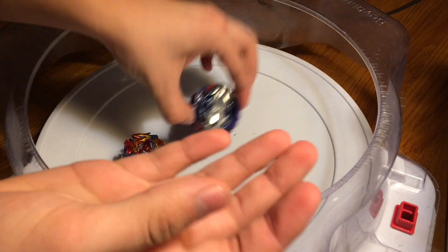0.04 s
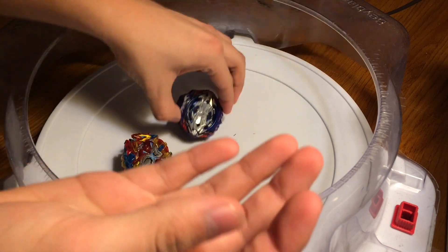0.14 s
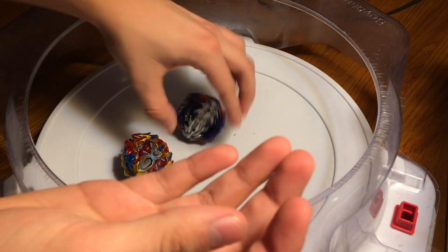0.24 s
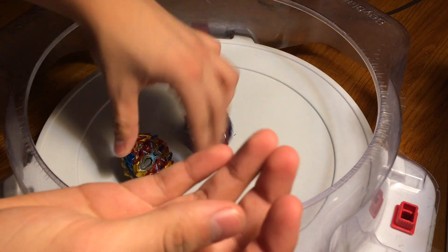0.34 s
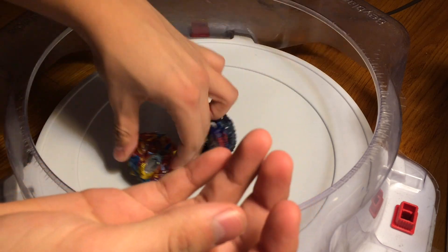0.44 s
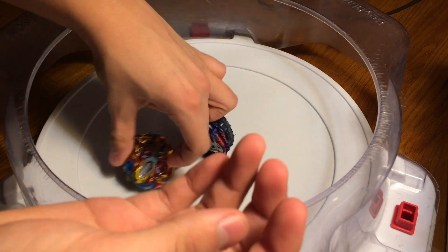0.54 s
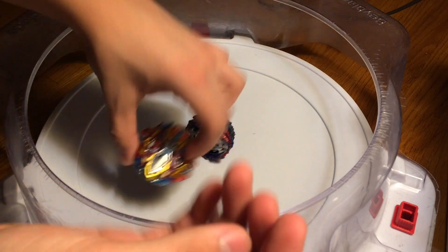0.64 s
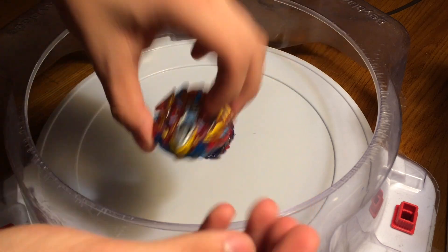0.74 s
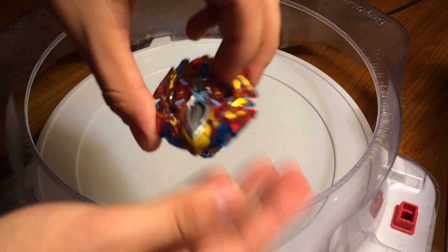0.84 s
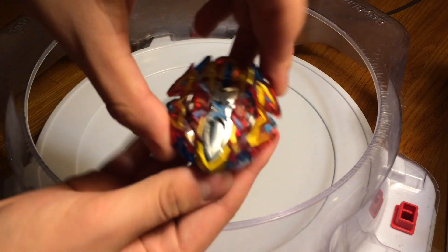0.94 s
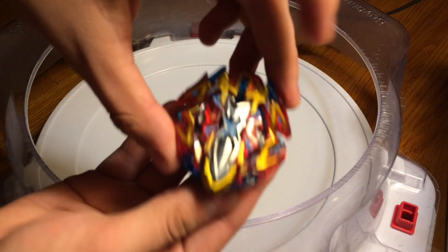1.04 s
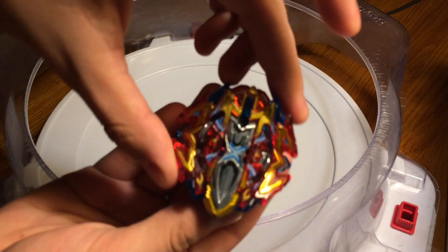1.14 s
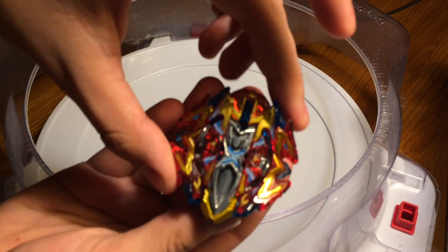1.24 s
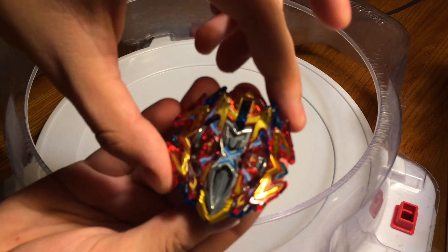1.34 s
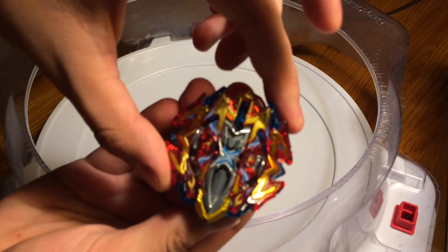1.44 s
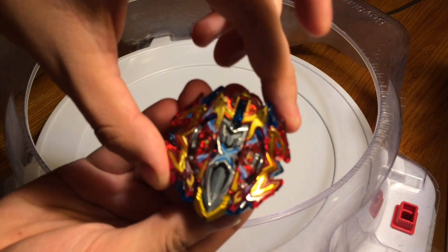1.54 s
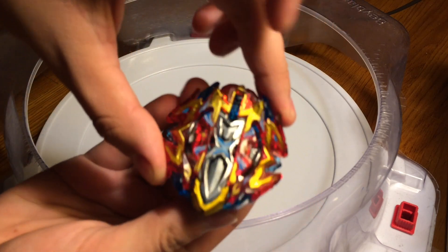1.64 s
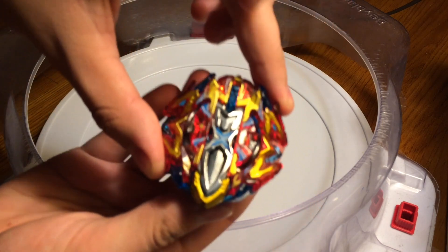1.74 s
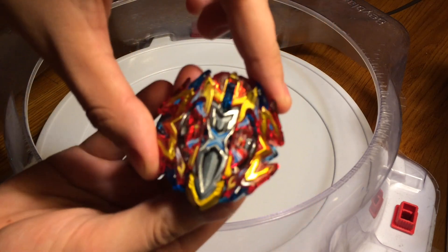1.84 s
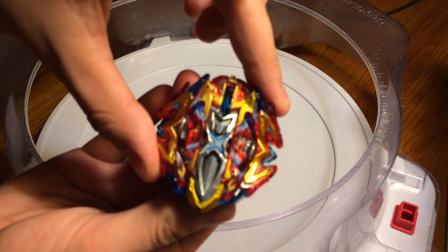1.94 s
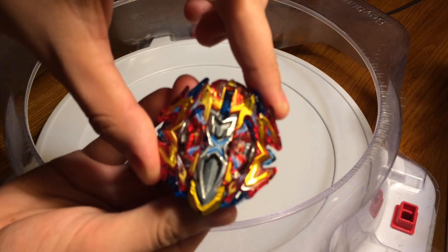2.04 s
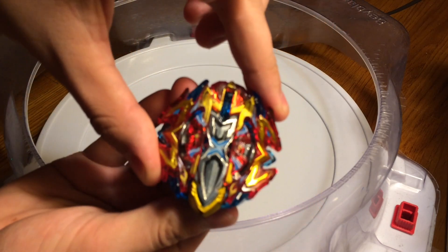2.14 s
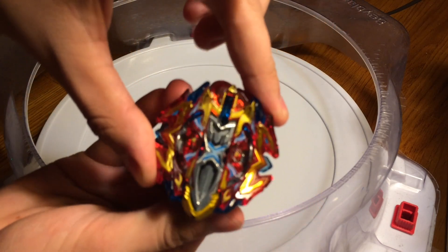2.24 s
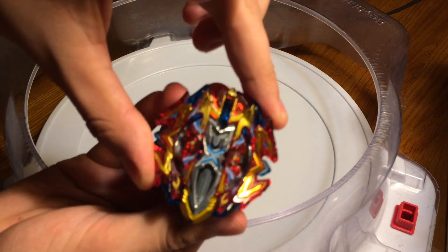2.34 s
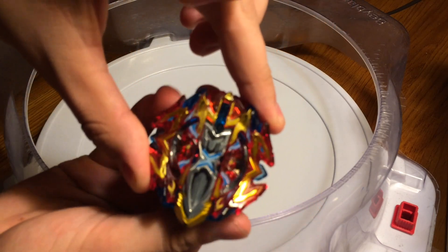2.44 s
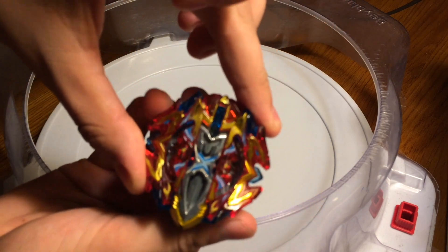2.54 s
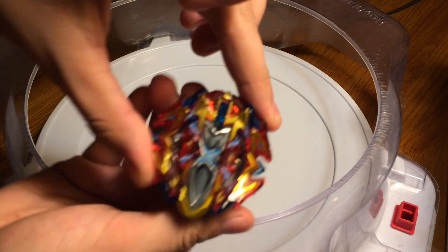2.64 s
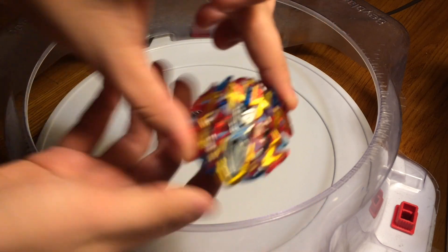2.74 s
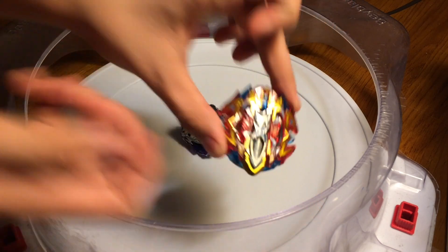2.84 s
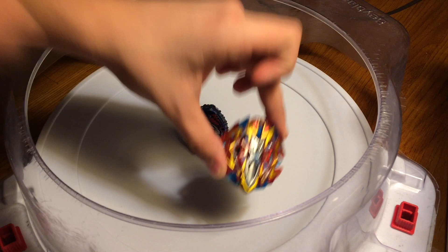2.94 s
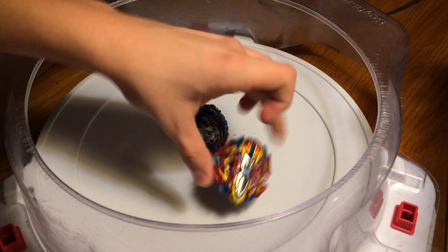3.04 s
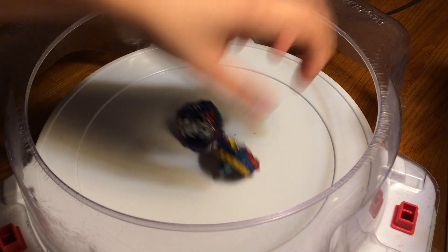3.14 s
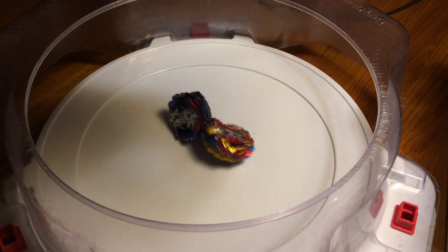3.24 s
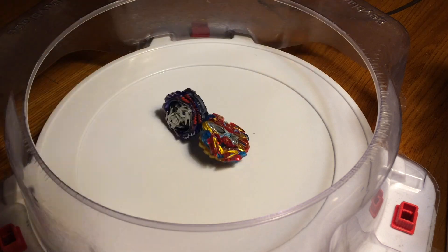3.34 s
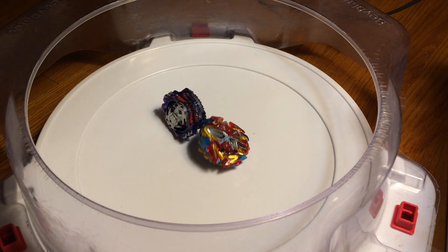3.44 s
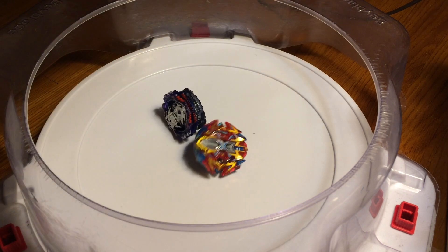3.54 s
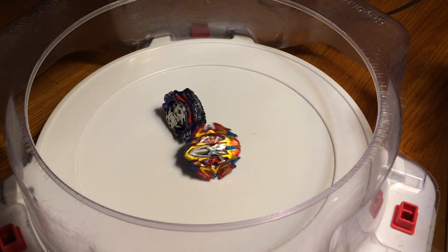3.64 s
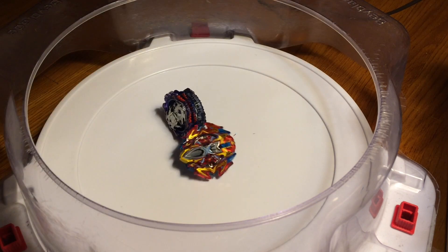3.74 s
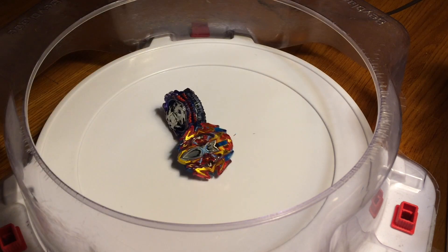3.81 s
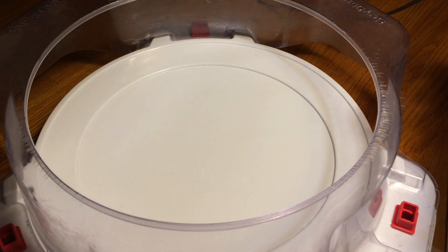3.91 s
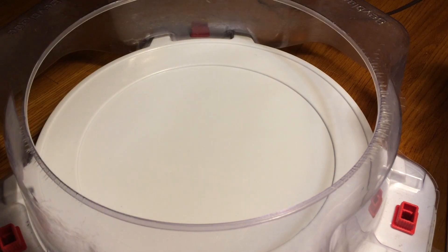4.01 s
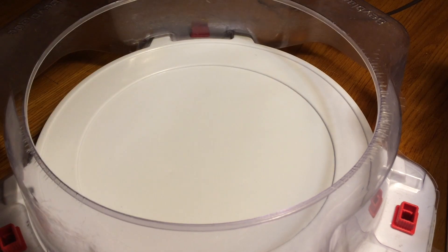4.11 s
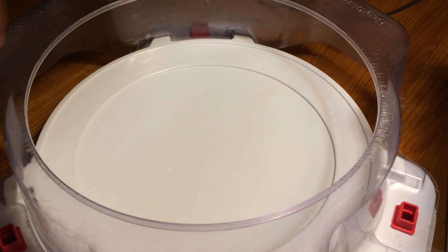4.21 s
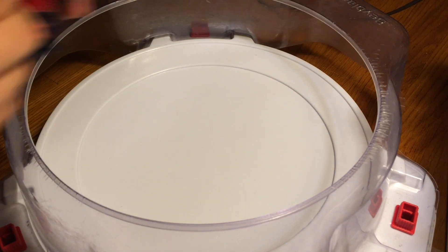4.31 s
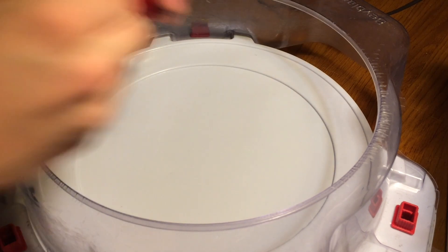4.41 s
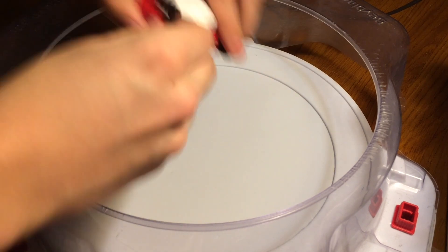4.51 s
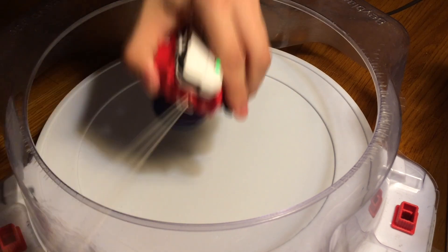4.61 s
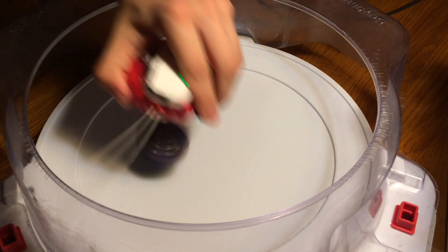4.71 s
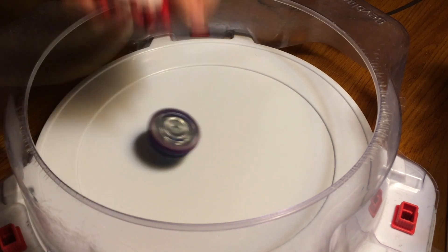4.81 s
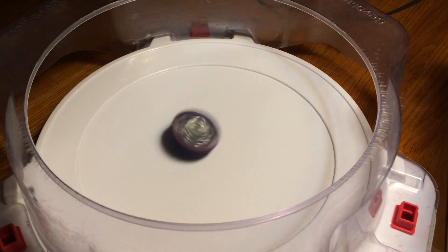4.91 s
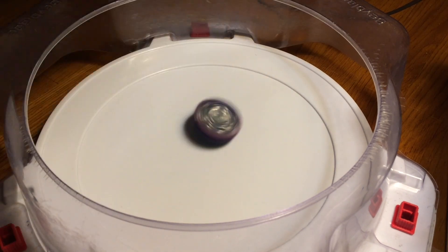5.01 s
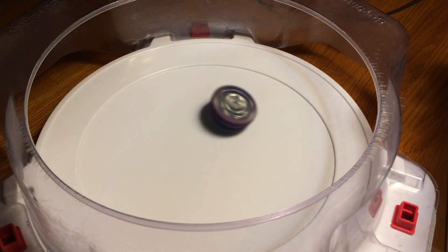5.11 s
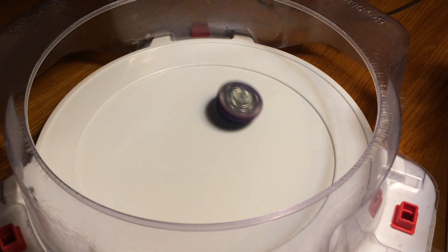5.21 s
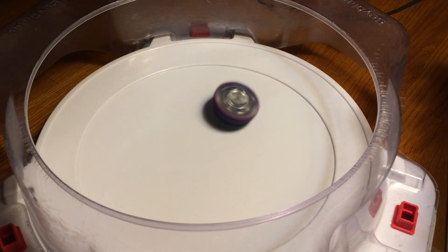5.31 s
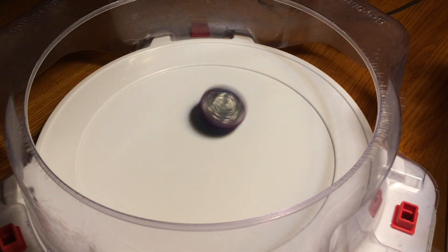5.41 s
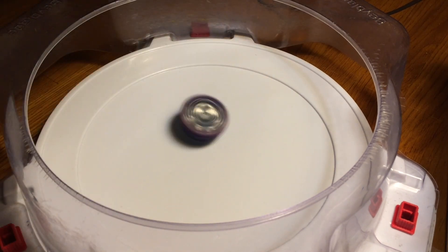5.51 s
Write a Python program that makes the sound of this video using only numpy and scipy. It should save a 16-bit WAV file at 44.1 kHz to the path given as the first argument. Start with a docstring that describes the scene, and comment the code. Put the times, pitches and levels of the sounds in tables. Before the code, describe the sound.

Toy tops clatter on the thin plastic floor of an arena, with hollow thuds and brief metallic rings. One is handled with faint ticks, twisted shut in three sharp clicks and dropped back with a loud rattle. A ratchet launcher then whirrs up, its cord ends with a dull jolt, and the spinning top hops and scrapes across the bowl. The sounds are close, in a small room with a faint low hum.

```python
"""Toy tops of plastic and metal clatter on the thin plastic floor of an arena, close by in a small room:
the floor thuds, the shells clack, the metal discs ring. One top is picked up, twisted shut in three
clicks (2.3 s) and dropped back (3.2 s). A ratchet launcher rustles in the hand, then whirrs up (4.7 s).
The spinning top leaves it and the cord runs out with a dull jolt; the top lands, hops and scrapes
across the bowl. The room murmurs throughout."""
import sys
import numpy as np
from scipy import signal
from scipy.io import wavfile
from scipy.ndimage import uniform_filter1d

SR = 44100
rng = np.random.default_rng(int(sys.argv[2]) if len(sys.argv) > 2 else 0)


def unload_audio(sound):
    """Save the sound as a 16-bit wav file, at the path given as the first command line argument."""
    columns = np.transpose(np.atleast_2d(sound))
    # keep every value between -1 and 1, then stretch to whole-number steps
    steps = np.round(np.clip(columns, -1, 1) * 32767)
    wavfile.write(sys.argv[1], SR, steps.astype(np.int16))


N = 245179
TIME_S = np.arange(N) / SR
HIT_TIME_S = TIME_S[:8192]

# room murmur (frequency [Hz], level [dB])
MURMUR_SPECTRUM = [(20, -24.5), (45, -11.5), (90, 5.5), (140, -2.5), (195, 4), (270, -7.5), (400, -8.5),
                   (700, -17.5), (1400, -20.5), (2800, -29.5), (6000, -29), (15000, -37.5)]
# hard parts clicking together, and at 3.2157 s two tops clashing rim on rim (time [s], strength [dB], hardness
# [dB])
PART_CLICKS = [(0.0133, -54.5, 3), (0.5554, -44.5, -2), (0.8288, -43.5, -1), (0.8494, -50.5, 3),
               (0.9475, -39.5, 2), (1.0389, -49, 1.5), (1.0716, -59.5, -6), (1.0957, -54, -1),
               (1.2236, -56, 0), (1.472, -63.5, 2), (1.7457, -56.5, 5), (1.886, -55.5, 4.5),
               (1.91, -51.5, 1.5), (2.4373, -44, 8), (2.59, -36, 5), (2.7639, -57, 5), (3.2157, -20.5, 5.5),
               (3.9438, -55.5, 1.5), (4.439, -37, -5), (4.554, -43.5, -3), (4.5798, -43, -1)]
# clack and tick of a small part (frequency [Hz], level [dB])
PART_CLACK_SPECTRUM = [(100, -81), (500, -17.5), (900, -6.5), (1300, 0), (1700, -4), (2300, 6), (3100, -8),
                       (3700, 3.5), (6000, -39.5), (12000, -54.5)]
PART_TICK_SPECTRUM = [(1500, -69), (3500, -21), (4800, 2.5), (5600, -2.5), (7000, 9.5), (8500, -1),
                      (10500, -2), (15500, -9)]
# metal discs ringing (time [s], level [dB], frequency [Hz])
DISC_RINGS = [(0.014, -46.5, 3200), (0.212, -34, 3260), (0.44, -41, 3330), (0.567, -36, 3280),
              (0.787, -41.5, 3333), (0.943, -55, 3260), (1.096, -60, 3320)]
# tops tumbling on the floor (time [s], strength [dB], edge hardness [dB], floor sag [dB])
FALLS = [(0.21, -18.5, 2, -11.5), (0.259, -37.5, 1, -4.5), (0.319, -22, -2, -7), (0.376, -33, -6.5, 4),
         (0.396, -35.5, -3.5, -27), (0.407, -32, -5.5, 5), (0.494, -43, -2.5, 6), (0.504, -38, 3, -3),
         (0.5673, -38.5, 1, -27), (0.6381, -48.5, -3, -4), (0.767, -43, -3, 2), (0.775, -36, -4, -1),
         (2.857, -43.5, -7, -12), (2.905, -55, -6.5, 0.5), (3.173, -16.5, -3, 6.5), (3.1781, -24, -2, 2),
         (3.186, -25.5, -1.5, -3), (3.1935, -20, -0.5, 4), (3.209, -29.5, 8, 0), (3.2164, -29, 10, 1),
         (3.235, -21, -3.5, 5.5), (3.279, -33, 3.5, -3), (3.341, -22.5, -0.5, 13.5), (3.348, -31, 3.5, -10),
         (3.3815, -33.5, -1.5, -1), (3.6, -43, -4.5, -2), (3.6635, -52, -8.5, -1), (3.727, -40, -4, 4.5),
         (3.888, -58, -6, -1)]
# arena floor modes (frequency [Hz], level [dB], T60 before damping factor [s])
FLOOR_MODES = [(100, -14, 0.043), (181.1, 0.5, 0.11), (211, -0.5, 0.14), (328, 4, 0.086), (380, 2, 0.069),
               (442, -1, 0.082), (515, 1, 0.049), (616, -3, 0.046), (630, -4, 0.011)]
# clack and tick of a top on the floor (frequency [Hz], level [dB])
TOP_CLACK_SPECTRUM = [(300, -31), (650, 3), (850, 1.5), (1100, 1), (1600, 3.5), (2400, -3), (3400, -6.5),
                      (5000, -14), (12000, -52)]
TOP_TICK_SPECTRUM = [(1000, -61.5), (2800, 9.5), (3900, -0.5), (6000, 3), (8000, 3), (11000, 0.5),
                     (15500, -3)]
# notches of the catch (time [s], strength [dB], creep lead [s], creep re notch [dB])
CATCH_NOTCHES = [(2.3216, -23.5, .016, -14.5), (2.5055, -23.5, 0.0043, -26), (2.6175, -24.5, 0.015, -17.5)]
# gear whine partials (multiple of tooth rate, level [dB])
GEAR_PARTIALS = [(1, 0), (2, -8), (3, -4), (4, -15)]
# launcher housing (frequency [Hz], level [dB])
HOUSING_SPECTRUM = [(120, -61), (200, -52), (774, -23), (896, -15.5), (1200, -7.5), (1310, -7), (1900, -5),
                    (2490, -1.5), (2730, -5), (3660, -5), (4240, -5.5), (4730, -5.5), (6450, -6.5),
                    (9820, -8.5), (15800, -20)]
# spinning top leaving the launcher and hopping (time [s], strength [dB], edge hardness [dB])
TOP_HOPS = [(4.782, -14.5, 4), (4.839, -17.5, -1.5), (4.847, -17.5, -5.5), (4.8544, -19.5, -6),
            (4.866, -30.5, -3), (4.889, -30.5, -4), (4.976, -22, -3), (5.024, -25.5, -6),
            (5.086, -23, -4.5), (5.125, -24, -5), (5.172, -16, -4.5), (5.246, -16.5, -5),
            (5.316, -15.5, -4.5), (5.353, -25.5, 2.5), (5.395, -15, -1), (5.425, -20, 0), (5.433, -24, -6),
            (5.47, -29.5, 8), (5.5, -26.5, -6), (5.5099, -30, -7.5)]
# tip rubbing the floor (time [s], relative level [dB])
SCRAPE_ENVELOPE = [(4.85, -29), (4.96, -30), (5.06, -23.5), (5.15, -19.5), (5.29, -21.5), (5.37, -24.5),
                   (5.5, -28.5), (5.56, -39)]
# tip scrape (frequency [Hz], level [dB])
SCRAPE_SPECTRUM = [(100, -19.5), (170, 14.5), (250, -16), (330, 2), (580, -4.5), (760, -19), (1100, 1),
                   (1800, 3), (3000, -2), (5000, -2.5), (8000, -5), (12000, -10.5), (15500, -18)]
# room decay (frequency [Hz], T60 [s])
ROOM_DECAY = [(100, 0.82), (400, 0.23), (1000, 0.33), (2500, 0.41), (7000, 0.29), (15000, 0.32)]
# echo colour (frequency [Hz], level [dB])
ECHO_SPECTRUM = [(100, -9), (250, -3.5), (450, 3), (1200, 2.5), (2400, -2), (4000, -0.5), (8000, -1.5),
                 (15000, -2.5)]

FIRM_DB = -20  # reference blow
AIM_S, PULL_S, LEAVE_S, CORD_END_S, LAND_S, SLACK_S = 4.18, 4.687, 4.77, 4.794, 4.84, 4.845


def amp(db):
    """Decibels to gain."""
    return 10 ** (np.asarray(db) / 20)


def unit(x):
    """Scales to rms 1."""
    return x / np.sqrt(np.mean(x ** 2) + 1e-20)


def burst(x):
    """Scales to the energy of 10 ms at rms 1."""
    return x * np.sqrt(.01 * SR / np.sum(x ** 2))


def since(start_s):
    """Seconds since start_s, zero before."""
    return np.maximum(TIME_S - start_s, 0)


def lookup(table, hz):
    """Interpolates over log frequency."""
    table_hz, values = np.transpose(table)
    return np.interp(np.log(hz + 1), np.log(table_hz + 1), values)


def add(mix, at_s, sound):
    """Mixes a sound in at at_s."""
    part = mix[max(round(at_s * SR), 0):][:len(sound)]
    part += sound[:len(part)]


def through(x, response):
    """Convolves, keeping the length of x."""
    return signal.oaconvolve(x, response)[:len(x)]


def colour(spectrum, size=2048):
    """Minimum-phase impulse response of a spectrum."""
    hz = abs(np.fft.fftfreq(size, 1 / SR))
    log_gain = np.log(amp(np.maximum(lookup(spectrum, hz), -100)))
    return np.fft.ifft(np.exp(np.conj(signal.hilbert(log_gain)))).real


def wobble(count, window):
    """Smoothed noise, rms 1."""
    return unit(uniform_filter1d(rng.standard_normal(count), size=window))


def grit(count, spread_db):
    """Micro-impacts: noise samples of widely varying size."""
    return unit(rng.standard_normal(count) * amp(spread_db * np.minimum(rng.exponential(1, count), 4)))


def contact(decay_s, rise_s, spread_db):
    """One touch: dense, decaying chatter."""
    envelope = np.exp(-HIT_TIME_S / max(decay_s, 1e-4)) * (1 - np.exp(-HIT_TIME_S / rise_s))
    return envelope * grit(len(HIT_TIME_S), spread_db)


def murmur(level_db, dip_s, dip_half_s, dip_db):
    """Low room noise; the level dips briefly."""
    dip = np.maximum(1 - abs(TIME_S - dip_s) / dip_half_s, 0)
    noise = unit(through(rng.standard_normal(N), colour(MURMUR_SPECTRUM, size=8192)))
    return amp(level_db + dip_db * dip) * noise


def snaps(rows, clack_db, tick_db, body_db, body_hz):
    """Hard parts snap together: a crack and a brief shiver over a dull body knock."""
    out = np.zeros(N)
    body_band = signal.butter(2, [body_hz / 2, body_hz * 2], "band", fs=SR)
    for at_s, db, hard_db in rows:
        detune = [rng.uniform(0.89, 1.08), 1]  # frequency column only
        crack = burst(contact(decay_s=0.0013, rise_s=0.00026, spread_db=0.99))
        shiver = amp(-3) * burst(contact(decay_s=0.0045, rise_s=0.00048, spread_db=2.8))
        drive = crack + shiver
        clack = through(drive, colour(np.multiply(PART_CLACK_SPECTRUM, detune)))
        tick = through(drive, colour(np.multiply(PART_TICK_SPECTRUM, detune)))
        add(out, at_s, amp(db - hard_db + clack_db) * burst(clack))
        add(out, at_s, amp(db + body_db) * burst(signal.lfilter(*body_band, drive)))
        add(out, at_s, amp(db + hard_db + tick_db) * burst(tick))
    return out


def discs(t60_s, beat_hz):
    """A metal disc rattles in its seat, ringing in a beating mode pair and two faint upper modes."""
    out, t = np.zeros(N), TIME_S[:SR // 2]
    for at_s, db, hz in DISC_RINGS:
        for mode_hz, mode_db in [(hz, 0), (hz + beat_hz, -3.5), (4200, -16.5), (6940, -17.5)]:
            rattle = unit(1 + wobble(len(t), 160))
            envelope = amp(db + mode_db - 60 * t / t60_s)
            add(out, at_s, rattle * envelope * np.sin(2 * np.pi * mode_hz * t))
    return out


def tumbles(rebound_s, rebound_db):
    """Strike rows: each fallen top rocks over and touches down again, more lightly."""
    rebounds = [(at_s + rebound_s * rng.uniform(.8, 1.2), db + rebound_db, hard_db, sag_db)
                for at_s, db, hard_db, sag_db in FALLS]
    return list(FALLS) + rebounds


def rim_teeth(decay_s, gap_s, count=4):
    """The teeth of a top's rim strike in turn, each more lightly."""
    out = np.zeros(len(HIT_TIME_S))
    for at_s in gap_s * (np.arange(count) + rng.uniform(-.25, .25, count)).clip(0):
        add(out, at_s, [np.exp(-at_s / max(decay_s, 1e-3))])
    return out / np.linalg.norm(out)


def floor_ring(sag_db, rim_db, damping):
    """Floor response: central blows favour the low modes, blows near the rim the high ones."""
    ring = np.zeros(len(HIT_TIME_S))
    for hz, db, t60_s in FLOOR_MODES:
        start_db = db + sag_db * (hz < 260) + rim_db * (hz > 470)
        ring += amp(start_db - 60 * damping * HIT_TIME_S / t60_s) * np.sin(2 * np.pi * hz * HIT_TIME_S)
    return signal.lfilter(*signal.butter(2, 135, "high", fs=SR), ring)  # little deep bass in the thud


def strikes(rows, thud_db, clack_db, tick_db, rim_db, firm_contact_s, rise_s, tooth_gap_s,
            chatter, damping, thud_stretch, clack_stretch):
    """A top hits the floor: the bowl thuds and shivers, the shell clacks, the edges tick."""
    out = np.zeros(N)
    clack_response, tick_response = colour(TOP_CLACK_SPECTRUM), colour(TOP_TICK_SPECTRUM)
    for at_s, db, hard_db, sag_db in rows:
        # weak blows lengthen the contact, hard edges shorten it
        contact_s = firm_contact_s * amp(.15 * (FIRM_DB - db) - .4 * hard_db)
        scuff = contact(contact_s, rise_s, spread_db=1.7)
        push = rim_teeth(contact_s * thud_stretch, tooth_gap_s) + chatter * scuff / np.linalg.norm(scuff)
        shiver = amp(-8) * burst(contact(decay_s=0.014, rise_s=0.0053, spread_db=3.5))
        shell = burst(contact(contact_s * clack_stretch, rise_s, spread_db=2.3))
        thud = through(push, floor_ring(sag_db, rim_db, damping))
        clack = through(shell + shiver, clack_response)
        tick = through(contact(contact_s, rise_s, spread_db=1.8), tick_response)
        add(out, at_s, amp(db - hard_db + thud_db) * burst(thud))
        add(out, at_s, amp(db + clack_db - 0.097 * sag_db) * burst(clack))  # sag cushions the clack
        add(out, at_s, amp(db + hard_db + tick_db) * burst(tick))
    return out


def twists(hard_db, creep_hz):
    """Snap rows: the catch creeps up each notch in small ticks, then drops in."""
    rows = []
    for at_s, db, creep_s, creep_db in CATCH_NOTCHES:
        rows.append((at_s, db, hard_db))
        for lag_s in np.arange(0, creep_s - .002, 1 / creep_hz):
            rows.append((at_s - creep_s + lag_s, db + creep_db, hard_db))
    return rows


def handling(level_db, hollow_hz, swell_db_per_s):
    """The hollow launcher rustles in the hand, louder as the grip tightens before the pull."""
    gate = (1 - np.exp(-since(AIM_S) / .05)) * (TIME_S < PULL_S)
    grip = amp(level_db - swell_db_per_s * abs(PULL_S - TIME_S))
    rustle = signal.lfilter(*signal.iirpeak(hollow_hz, Q=6, fs=SR), grit(N, spread_db=3))
    return gate * grip * unit(rustle)


def pull(rise_db_per_s=688, tire_db_per_s=24, release_db_per_s=522, rewind_s=.15):
    """Cord force: the pull bites, tires and lets go; the cord winds back in."""
    rise_db = rise_db_per_s * np.maximum(PULL_S - TIME_S, 0)
    force = amp(-8.5 - rise_db - tire_db_per_s * since(PULL_S) - release_db_per_s * since(SLACK_S))
    rewind = amp(-30.5) * (TIME_S > SLACK_S) * np.exp(-(since(SLACK_S) / rewind_s) ** 2)
    return np.hypot(force, rewind)


def launcher(gain_db, whine_db, slow_hz, fast_hz, spin_up_at_s, spin_up_width_s, coast_s):
    """Gear teeth whine upward, then coast, while the ratchet rattles the housing."""
    spin_up = (1 + np.tanh((TIME_S - spin_up_at_s) / spin_up_width_s)) / 2
    tooth_hz = (slow_hz + (fast_hz - slow_hz) * spin_up) * np.exp(-since(LEAVE_S) / coast_s)
    teeth = np.cumsum(tooth_hz * (1 + .025 * wobble(N, 60))) / SR
    whine = unit(sum(amp(db) * np.cos(2 * np.pi * k * teeth) for k, db in GEAR_PARTIALS))
    engaged = np.interp(since(LEAVE_S), [0, .03], [1, .3])  # gears run free once the top has left
    tooth_pulses = 0.61 + np.exp(-(teeth % 1) / 0.37)
    rattle = unit(grit(N, spread_db=1.5) * tooth_pulses)
    drive = amp(whine_db) * engaged * whine + rattle
    return pull() * amp(gain_db) * unit(through(drive, colour(HOUSING_SPECTRUM)))


def hops(firm_sag_db, stiffening):
    """Strike rows: harder hops land on the stiff slope and sag less."""
    return [(at_s, db, hard_db, firm_sag_db - stiffening * (db - FIRM_DB))
            for at_s, db, hard_db in TOP_HOPS]


def jolt(level_db, hz, rise_s):
    """The cord reaches its end: one dull low push."""
    out = np.zeros(N)
    envelope = HIT_TIME_S / rise_s * np.exp(1 - HIT_TIME_S / rise_s)
    add(out, CORD_END_S, amp(level_db) * envelope * np.sin(2 * np.pi * hz * HIT_TIME_S))
    return out


def tip_scrape(gain_db, spin_hz, throb_db, uneven_db):
    """The spinning tip rubs the floor unevenly, pressing slightly harder once a turn."""
    pressure = amp(throb_db * np.sin(2 * np.pi * spin_hz * TIME_S) + uneven_db * wobble(N, 200))
    scrape = unit(through(pressure * grit(N, spread_db=2.5), colour(SCRAPE_SPECTRUM)))
    envelope_db = np.interp(TIME_S, *np.transpose(SCRAPE_ENVELOPE))
    return (TIME_S > LAND_S) * amp(envelope_db + gain_db) * scrape


def room(x, wall_db, wall_decay_s, tail_db, tail_rise_s, taps_per_s=6000):
    """Quick echoes off the arena wall, then the room's tail, each band at its own decay rate."""
    count = SR // 2
    t = TIME_S[:count]
    taps = rng.choice([-1., 1.], count) * (rng.random(count) < taps_per_s / SR)
    hz, frame_s, bands = signal.stft(taps, SR, nperseg=256)
    decay = amp(-60 * frame_s / lookup(ROOM_DECAY, hz)[:, None])
    tail = signal.istft(bands * decay, SR, nperseg=256)[1][:count]
    tail *= 1 - np.exp(-t / tail_rise_s)
    wall = rng.permutation(taps) * np.exp(-t / wall_decay_s) * (t > .0015)
    echoes = amp(tail_db) * tail / np.linalg.norm(tail) + amp(wall_db) * wall / np.linalg.norm(wall)
    return through(x, through(echoes, colour(ECHO_SPECTRUM)))


def scene():
    """All sources, their echoes and the room murmur; mono."""
    direct = strikes(tumbles(rebound_s=0.018, rebound_db=-13), thud_db=1, clack_db=-2, tick_db=-2,
                     rim_db=-3, firm_contact_s=0.0053, rise_s=0.00086, tooth_gap_s=0.0027,
                     chatter=0.34, damping=1.2, thud_stretch=0.3, clack_stretch=0.8)
    direct += strikes(hops(firm_sag_db=-4, stiffening=1.12), thud_db=0.65, clack_db=-1, tick_db=-0.2,
                      rim_db=5, firm_contact_s=0.0063, rise_s=0.00047, tooth_gap_s=0.0044,
                      chatter=0.7, damping=2.7, thud_stretch=1.4, clack_stretch=0.99)
    clicks = list(PART_CLICKS) + twists(hard_db=7, creep_hz=190)
    direct += snaps(clicks, clack_db=-0.7, tick_db=-0.56, body_db=-19, body_hz=514)
    direct += discs(t60_s=.19, beat_hz=92)
    direct += launcher(gain_db=-2, whine_db=-6.5, slow_hz=1183, fast_hz=2019,
                       spin_up_at_s=4.73, spin_up_width_s=.022, coast_s=0.34)
    direct += handling(level_db=-52.5, hollow_hz=1240, swell_db_per_s=40)
    direct += jolt(level_db=-14.5, hz=78, rise_s=0.0058)
    direct += tip_scrape(gain_db=-5, spin_hz=61.7, throb_db=0.1, uneven_db=1.7)
    echoes = room(direct, wall_db=-11, wall_decay_s=0.0063, tail_db=-10, tail_rise_s=0.0031)
    background = murmur(level_db=-59.5, dip_s=3.994, dip_half_s=.029, dip_db=-34)
    return (direct + echoes + background)[None]


def record(dry):
    """Soft peak limiter, then a 16 kHz low-pass."""
    limited = dry / (1 + dry ** 6) ** (1 / 6)
    low_pass = signal.firwin(301, 16000, window=("kaiser", 9), fs=SR)
    return signal.oaconvolve(limited, low_pass[None], "same")


dry = scene()
out = record(dry)
unload_audio(out)
```